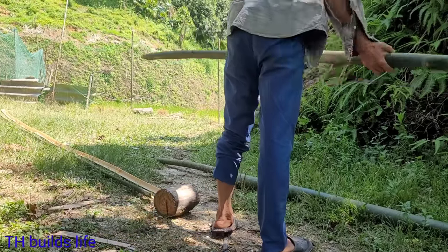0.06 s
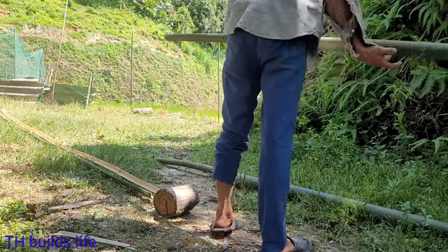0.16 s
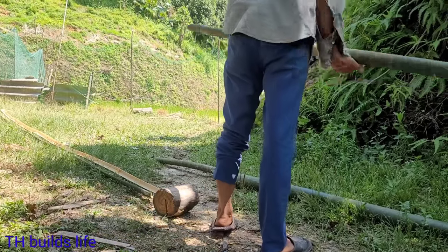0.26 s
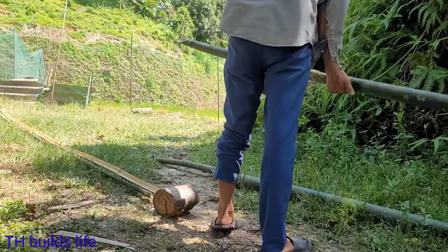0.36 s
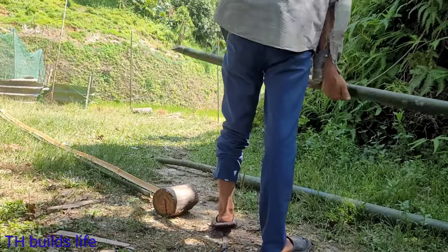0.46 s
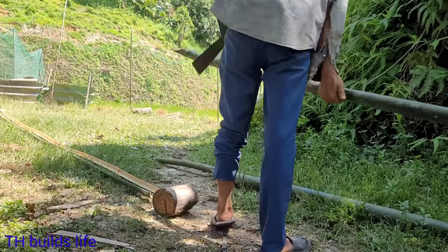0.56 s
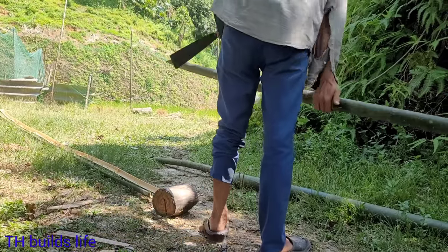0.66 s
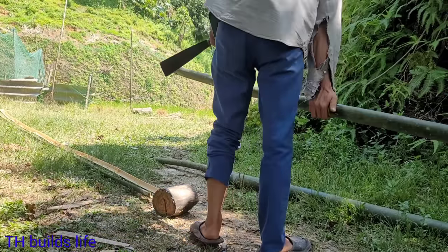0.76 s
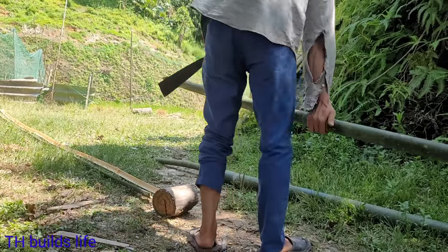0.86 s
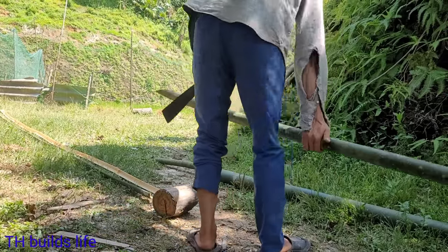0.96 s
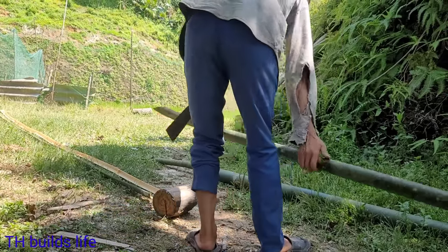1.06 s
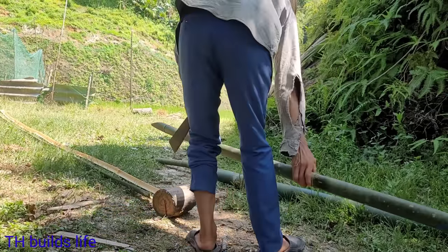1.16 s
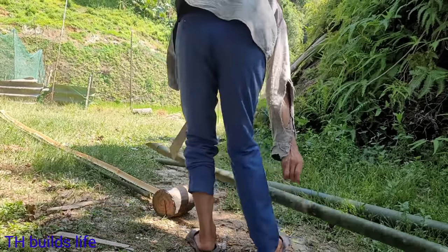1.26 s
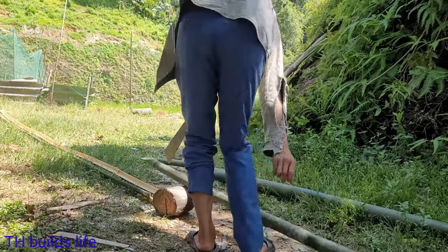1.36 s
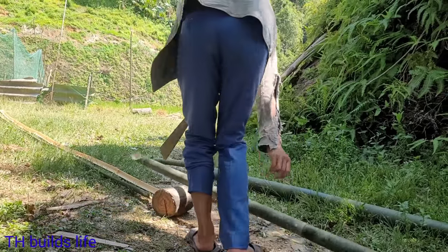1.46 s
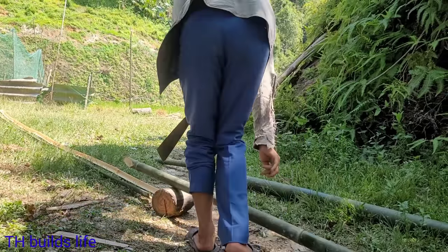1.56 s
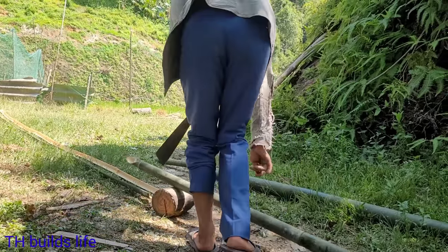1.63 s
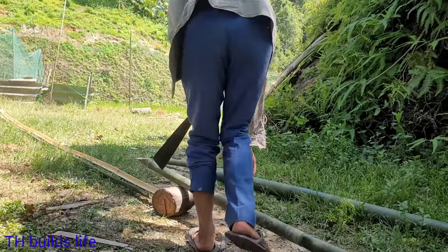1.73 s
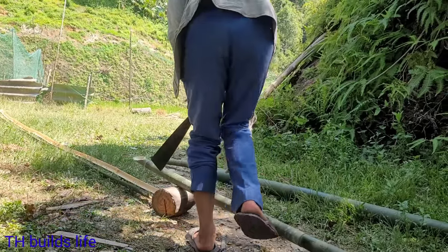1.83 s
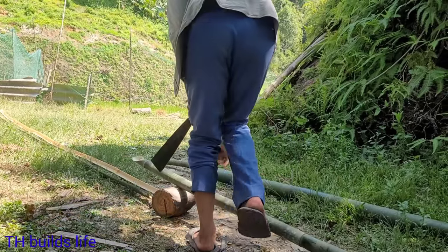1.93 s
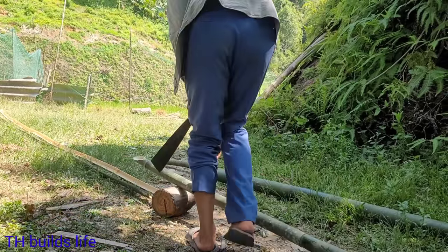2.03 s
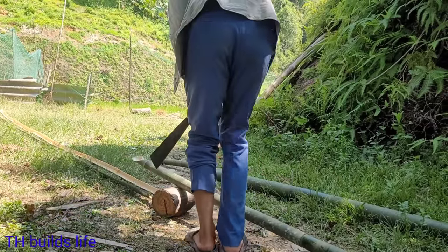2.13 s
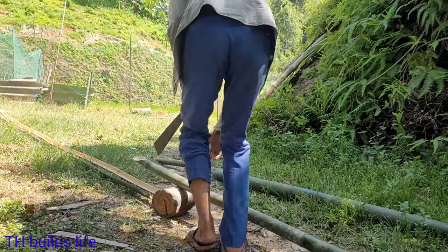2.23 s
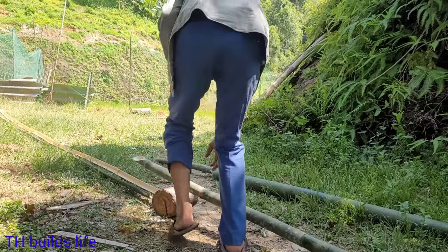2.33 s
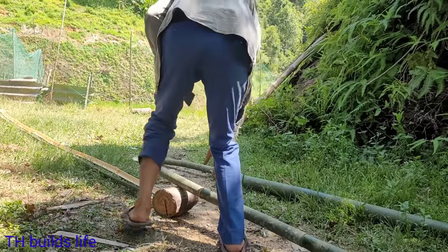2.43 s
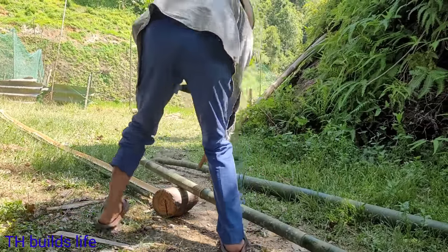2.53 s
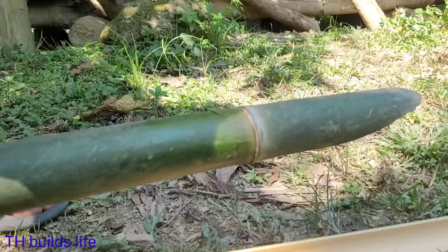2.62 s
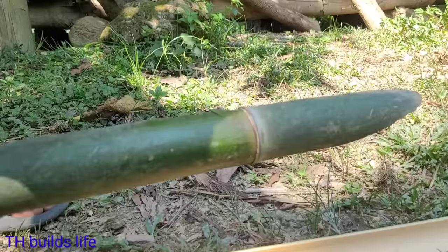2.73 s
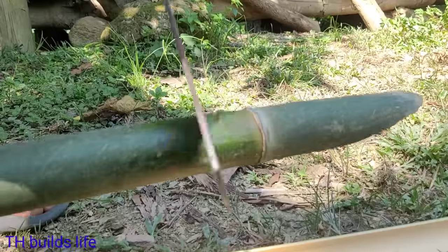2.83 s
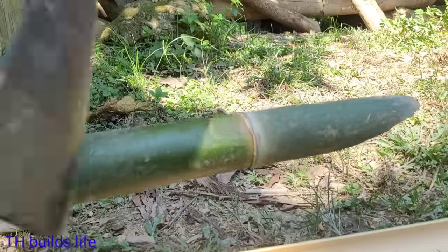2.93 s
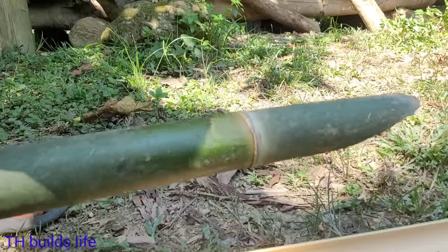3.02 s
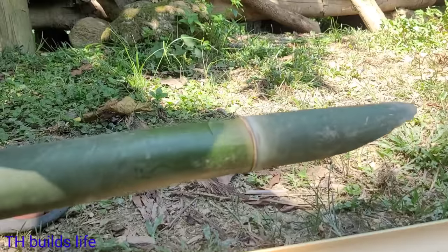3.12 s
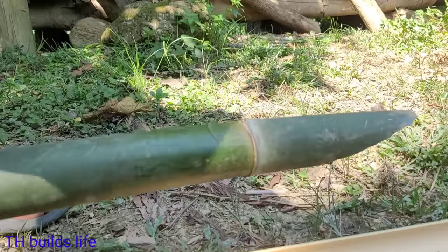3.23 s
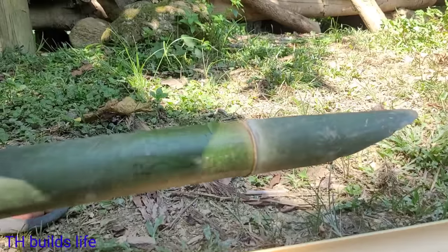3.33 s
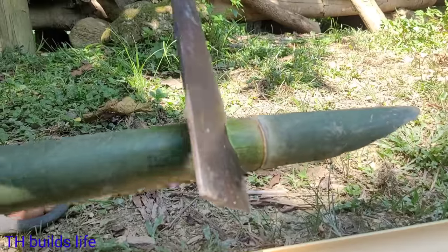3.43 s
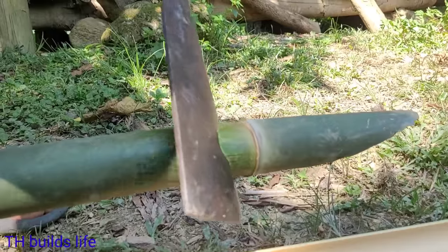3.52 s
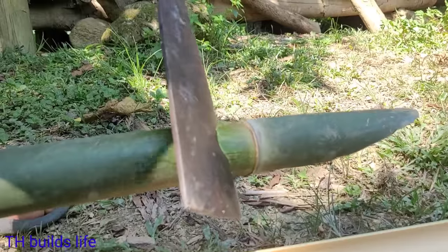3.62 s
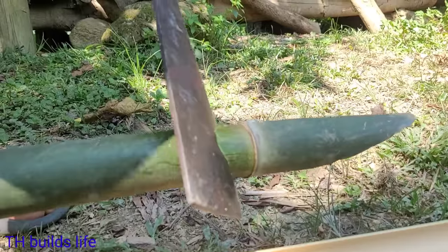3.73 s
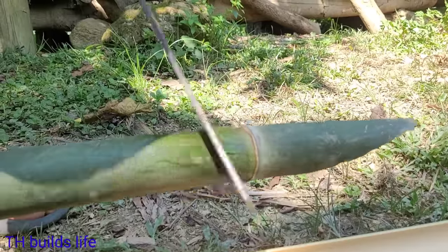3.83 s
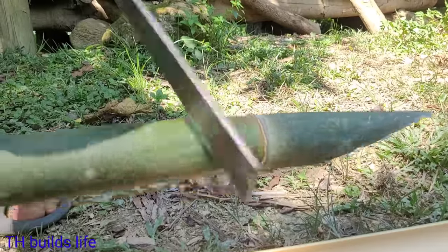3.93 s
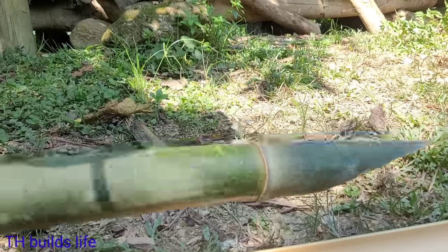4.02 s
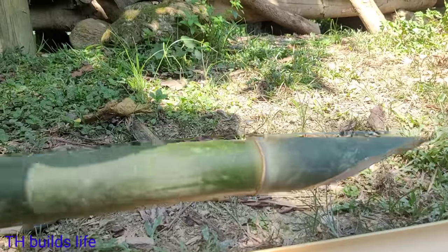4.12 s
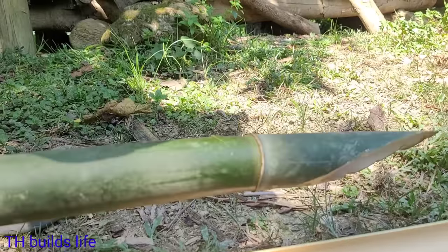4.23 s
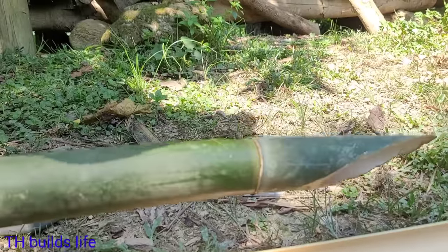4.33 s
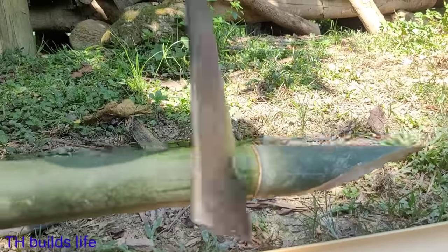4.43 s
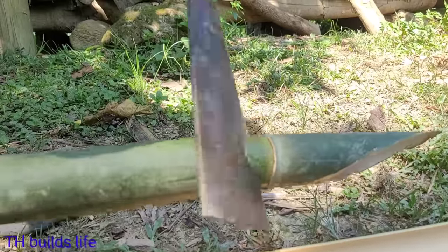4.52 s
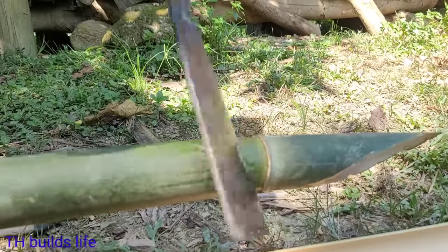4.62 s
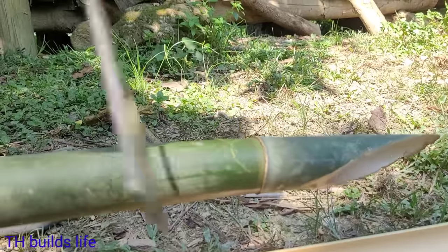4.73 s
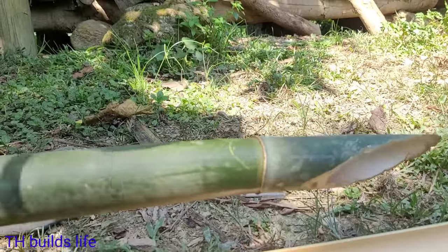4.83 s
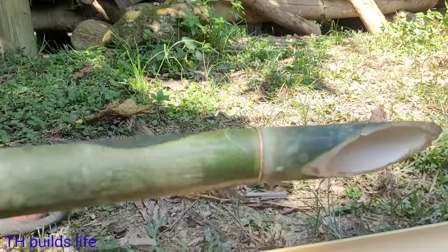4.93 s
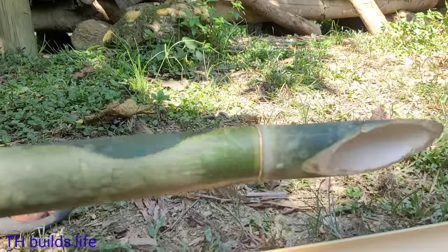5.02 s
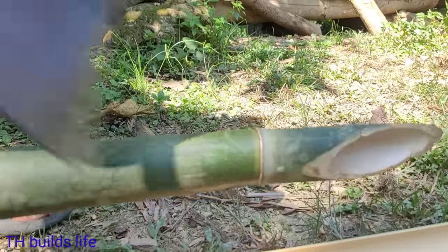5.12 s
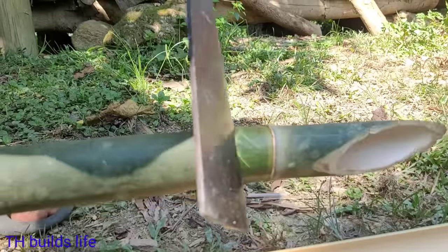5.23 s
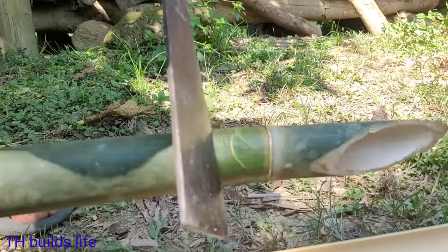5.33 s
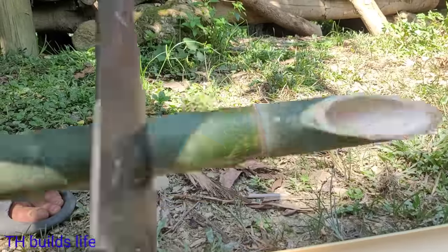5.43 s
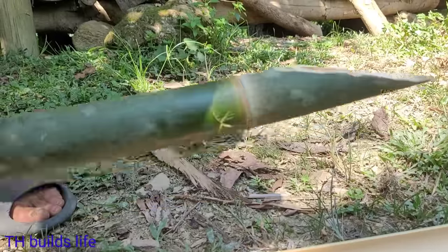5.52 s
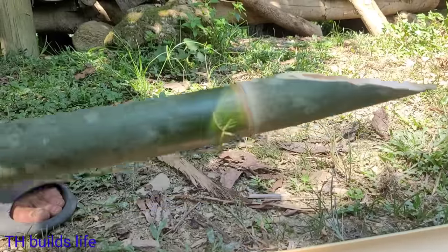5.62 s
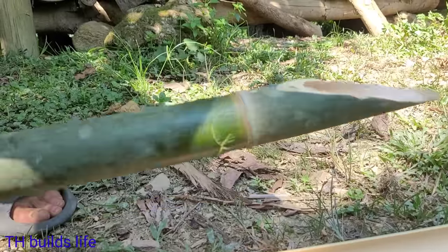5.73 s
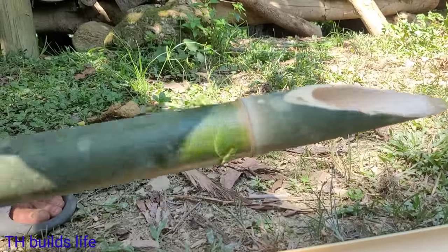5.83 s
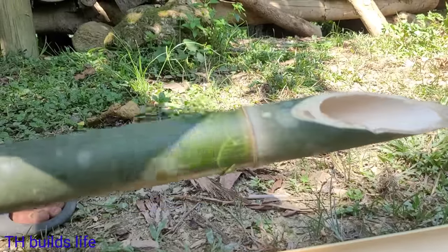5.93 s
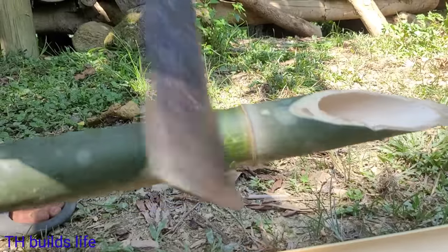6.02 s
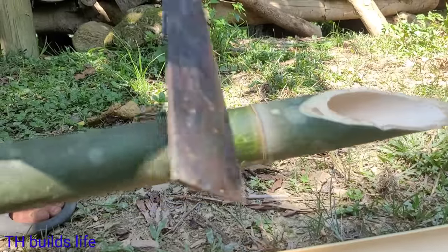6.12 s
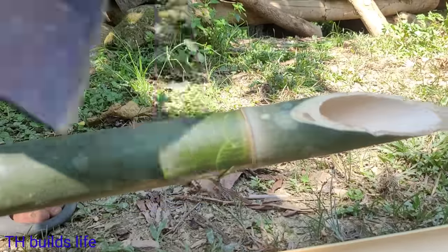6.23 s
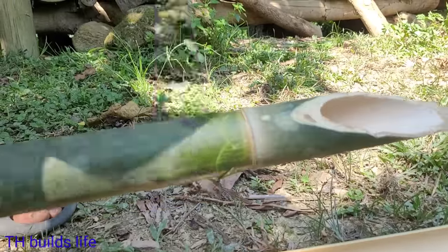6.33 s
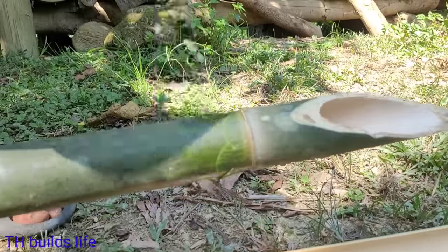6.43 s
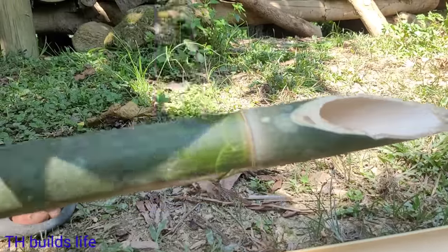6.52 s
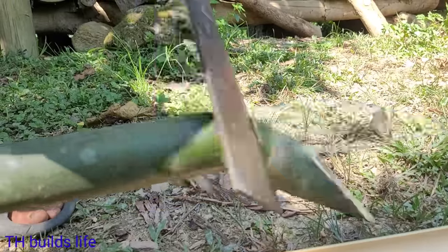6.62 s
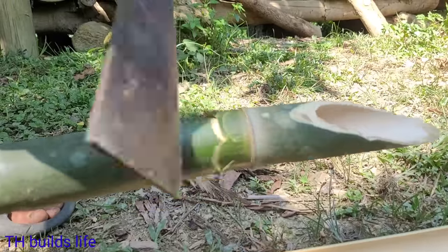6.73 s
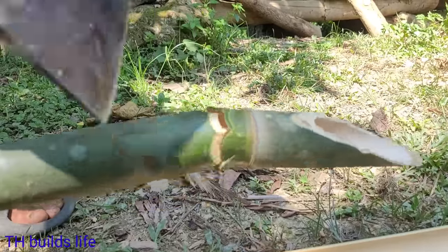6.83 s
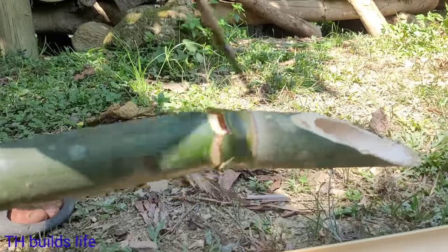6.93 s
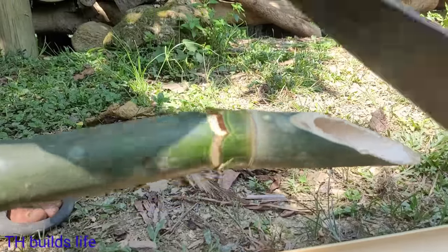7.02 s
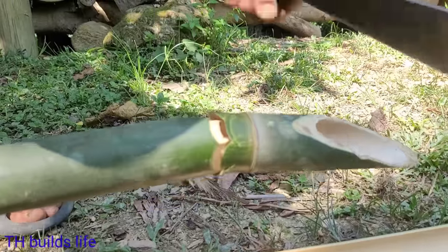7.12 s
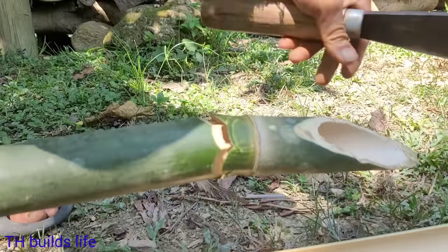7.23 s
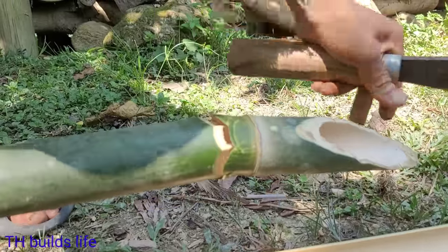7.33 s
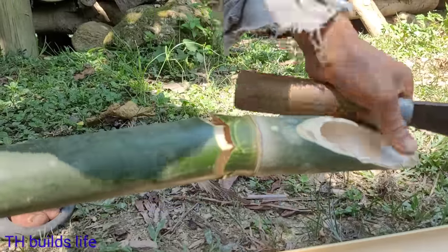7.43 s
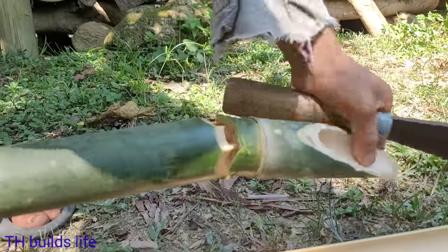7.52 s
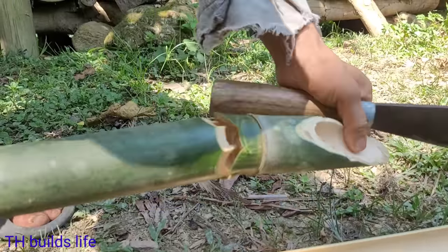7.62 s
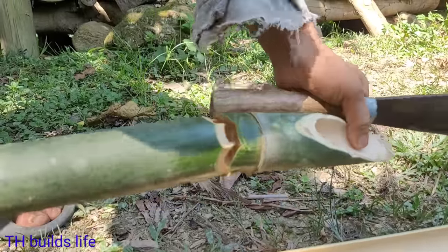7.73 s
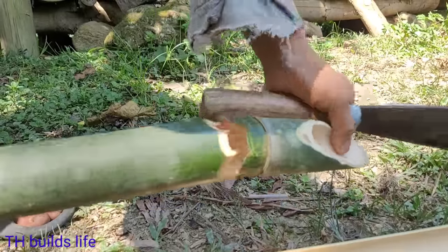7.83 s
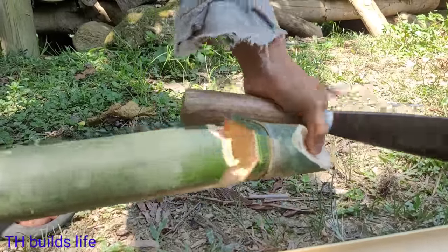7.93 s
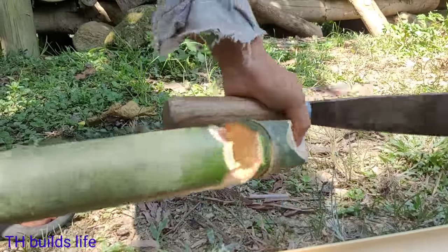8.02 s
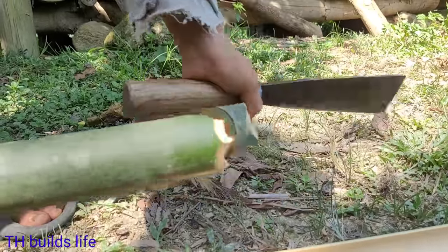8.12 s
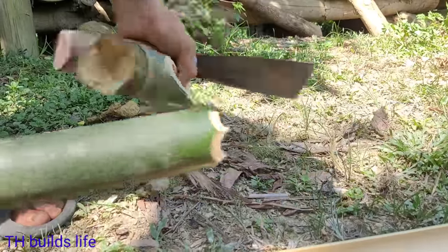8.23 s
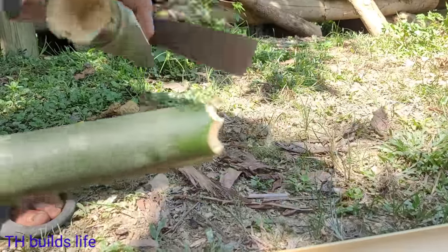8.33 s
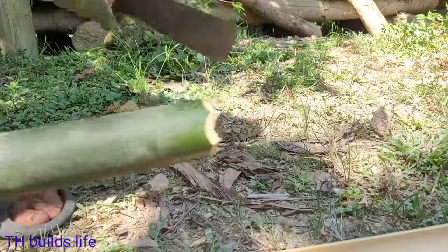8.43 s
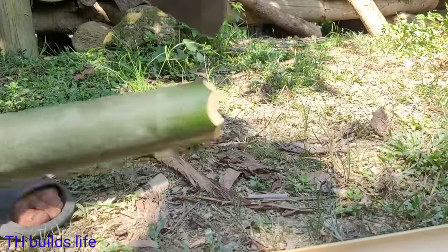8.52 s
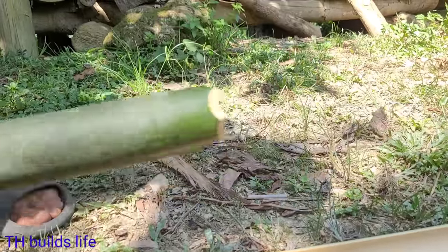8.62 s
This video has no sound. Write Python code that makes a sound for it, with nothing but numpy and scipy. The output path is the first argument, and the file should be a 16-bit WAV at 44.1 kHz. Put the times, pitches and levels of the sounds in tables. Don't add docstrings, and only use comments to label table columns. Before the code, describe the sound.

Outdoors with faint insects, bamboo drops with ringing hollow knocks, a blade chops it six times nearby, then fibres crack and rip apart.

```python
import sys
import numpy as np
from scipy import signal
from scipy.fft import rfft, irfft
from scipy.io import wavfile
from scipy.ndimage import uniform_filter1d

SR = 44100
rng = np.random.default_rng(int(sys.argv[2]) if len(sys.argv) > 2 else 0)


def wav_record(signal):
    frames = np.transpose(np.atleast_2d(signal))
    bounded = np.clip(frames, -1, 1)
    quanta = np.round(bounded * 32767).astype(np.int16)
    wavfile.write(sys.argv[1], SR, quanta)


def invert_db(x):
    u = np.asarray(x, float) / 20
    return 10 ** u


N = 381906
MOVE_S = 2.72


def ears(length, alike, lag):
    same, left, right = rng.standard_normal((3, length))
    alike = np.clip(alike, 0, 1)
    shared = np.array([same, np.roll(same, lag)])
    return np.sqrt(alike) * shared + np.sqrt(1 - alike) * np.array([left, right])


def grit(length, spread_db, size=40):
    grain_db = spread_db * np.minimum(rng.exponential(size=length // size + 1), 3)
    g = np.repeat(invert_db(grain_db), size)[:length]
    return g / np.sqrt(np.mean(g ** 2))


def fade(t, t60, rise):
    return (1 - np.exp(-t / rise)) * np.exp(-np.log(1000) * t / t60)


def swell(s, rise, fall, db, top=1.5):
    gain = np.zeros(N)
    first = max(int((s - 2 * rise) * SR), 0)
    last = min(int((s + 2 * fall) * SR), N)
    near = np.arange(first, last)
    t = near / SR - s
    gain[near] = invert_db(db - 24 * np.where(t < 0, -t / rise, t / fall) ** top)
    return gain


def pan(db):
    return invert_db([[db], [-db]])


def add(out, s, x):
    i = int(s * SR)
    out[:, i:i + x.shape[1]] += x[:, :N - i]


def through(x, h):
    return signal.oaconvolve(x, h[None], axes=1)[:, :x.shape[1]]


def causal(points):
    hz, db = np.transpose(points)
    log_hz = np.log(np.linspace(1, SR / 2, 1025))
    log_gain = np.interp(log_hz, np.log(hz), db, left=db[0] - 21.5) * np.log(10) / 20
    cep = irfft(log_gain)
    cep[1:1024] *= 2
    cep[1025:] = 0
    h = irfft(np.exp(rfft(cep)))
    return h / np.sqrt(np.sum(h ** 2))


def rings(modes, shift=1, count=2500):
    t = np.arange(count) / SR
    h = np.zeros(count)
    for k, (hz, db, t60) in enumerate(modes):
        h += (-1) ** k * invert_db(db) * np.sin(2 * np.pi * hz * shift * t) * fade(t, t60, 1e-5)
    return h / np.sqrt(np.sum(h ** 2))


# frequency in Hz, width in Hz, level in dB.
LOOSE_TUBE_MODES = [
    [(320, 170, -6), (393, 53, 7.5), (489, 15, 1), (605, 23, 3.5), (702, 60, -1)],
    [(797, 30, -1.5), (898, 91, -1), (1028, 27, -2), (1250, 43, -1)],
]
HELD_TUBE_MODES = [
    [(170, 100, -6.5), (280, 29, -7), (390, 74, -2.5), (489, 65, -2.5), (635, 70, -3), (740, 120, -1)],
    [(900, 71, -11.5), (1002, 110, -9.5), (1010, 63, 4.5), (1182, 30, -1.5)],
]
LOOSE_WALL_MODES = [(1340, 55, -6), (1681, 40, -5.5), (1820, 120, -10), (2010, 95, -4.5), (2510, 250, -9),
                    (3350, 770, -9), (3970, 730, -9.5), (4700, 430, -14.5)]
HELD_WALL_MODES = [(1370, 70, -1.5), (1567, 20, -2), (1790, 120, -2), (2070, 27, -4), (2340, 190, -5),
                   (2920, 170, -6), (3220, 140, -7.5), (4080, 290, -7.5), (4172, 590, -18),
                   (5260, 1100, -14.5)]


def tube(peaks, shift):
    spot_db = 1.6 * rng.standard_normal(len(peaks))
    modes = []
    for (hz, width_hz, db), d in zip(peaks, spot_db):
        width_hz = max(width_hz, hz / 20)
        modes.append((hz, db + d + 10 * np.log10(width_hz), 1.77 / width_hz))
    return rings(modes, shift)


def narrow(hz, width_hz, alike, size=8):
    low = signal.butter(2, width_hz / 2, fs=SR / size, output="sos")
    turn = 2 * np.pi * np.cumsum(hz * np.ones(N)) / SR

    def slow():
        x = signal.sosfilt(low, ears(N // size + 1, alike, 0))
        return uniform_filter1d(np.repeat(x, size, axis=1), size)[:, :N]

    band = slow() * np.cos(turn) + slow() * np.sin(turn)
    return band * np.sqrt(SR / size / 0.8 / width_hz)


def nearest(peak_s):
    peak_s = np.asarray(peak_s)
    return np.searchsorted((peak_s[1:] + peak_s[:-1]) / 2, np.arange(N) / SR)


# peak in seconds, level in dB.
BIRD_NOTES = [
    (4.27, -66),
    (4.97, -71.5),
    (6.39, -73.5),
]


def bird():
    peak_s = np.array(BIRD_NOTES)[:, 0]
    since_s = np.arange(N) / SR - peak_s[nearest(peak_s)]
    pitch_hz = 4900 - 7000 * np.clip(since_s, -.1, .3)
    gain = sum(swell(s, 0.066, .22, db) for s, db in BIRD_NOTES)
    return narrow(pitch_hz, 650.0, 0.25) * gain


# frequency in Hz, width in Hz, rms level in dB.
INSECT_BANDS = [(7860, 260, -82), (10400, 1000, -76.5), (11900, 450, -74)]
# frequency in Hz, level in dB per Hz.
AIR_COLOUR = [(30, -19), (131, -8.5), (1370, -28.5), (2600, -32), (4590, -21), (7180, -25), (11500, -9.5),
              (13200, -28)]


def bush():
    far_db, near_db = -62.5, -67
    shimmer = np.repeat(rng.standard_normal(N // 1500 + 1), 1500)[:N]
    shimmer = uniform_filter1d(shimmer, 1500)
    db = np.where(np.arange(N) < MOVE_S * SR, far_db - near_db, 0) + 0.86 * shimmer
    insects = sum(invert_db(level_db) * narrow(hz, width_hz, .1) for hz, width_hz, level_db in INSECT_BANDS)
    air = through(ears(N, 0.47, 0) * invert_db(near_db), causal(AIR_COLOUR))
    return (air + insects) * invert_db(db) + bird() * grit(N, 1.0, size=300)


# peak, rise and fall in seconds, level in dB.
RUMBLE_SWELLS = [(2.22, .05, 0.11, -50.5), (3.52, .04, .12, -37.5), (4.12, 0.022, .05, -39),
                 (4.25, 0.013, 0.066, -52), (4.56, .04, 0.1, -32), (5.12, .05, 0.085, -58),
                 (5.66, .05, 0.18, -47.5), (3.05, .1, .12, -54), (5.815, .01, .12, -38),
                 (6.9, .1, .07, -58), (8.26, .015, 0.052, -35), (8.4, .1, .12, -54.5),
                 (8.58, 0.055, .12, -59.5)]
# frequency in Hz, level in dB per Hz.
SOIL_COLOUR = [(50, -20), (110, -3), (200, -0.5), (330, -4), (600, -14), (1200, -35)]


def rumble():
    gain = sum(swell(*row) for row in RUMBLE_SWELLS)
    pushes = ears(N, 0.92, 8) * grit(N, 3.0, size=400)
    return through(pushes * gain, causal(SOIL_COLOUR))


# peak, rise and fall in
# seconds, wall level in dB, hiss level in dB.
RUB_SWELLS = [(.03, .02, 0.11, -59.5, -76), (.15, .12, 0.11, -67, -64), (.21, .1, 0.038, -74, -46.5),
              (.304, 0.0064, .2, -35.5, -38), (.41, 0.116, .12, -38.5, -42), (.5, 0.031, .06, -46, -55.5),
              (.63, .08, .08, -55, -53), (.7, 0.085, .1, -55, -62), (.885, 0.014, 0.081, -45.5, -43),
              (1.262, .06, .05, -39.5, -45.5), (1.36, .1, .1, -48, -45), (1.47, .06, .12, -40, -36),
              (1.5, .09, .42, -35, -50), (1.62, .04, .08, -42, -54), (1.72, .1, .12, -40.5, -60),
              (2.203, 0.033, 0.03, -37.5, -35), (2.24, .03, 0.065, -47.5, -50), (2.312, .02, .02, -63, -52.5),
              (2.38, .015, .07, -50.5, -51), (2.688, .03, .04, -40, -46.5),
              (2.79, 0.033, 0.043, -49, -52), (3.315, .04, .05, -68.5, -80), (3.716, .15, 0.041, -63.5, -54),
             (3.864, .03, 0.11, -55.5, -49.5), (4.022, .012, 0.027, -45.5, -75),
             (4.068, 0.0098, 0.033, -38, -70), (4.245, .015, .055, -45.5, -70),
             (5.0, 0.089, .05, -64.5, -66), (5.35, .06, 0.083, -48, -43), (5.413, .007, 0.23, -44, -42.5),
             (5.7, 0.054, 0.17, -57.5, -72), (7.6, .08, .08, -66, -67), (8.165, .012, 0.11, -40, -38),
             (8.3, .1, .1, -55, -60), (8.42, .12, 0.064, -50.5, -58.5), (8.53, .08, .1, -69.5, -67.5),
             (8.66, 0.043, .1, -60, -60)]
# frequency in Hz, level in dB per Hz.
RUB_WALL_COLOUR = [(120, -48.5), (200, -18), (311, -8.5), (384, -4.5), (717, -8), (895, -2), (2300, -7.5),
                   (6500, -30)]
RUB_HISS_COLOUR = [(1650, -30.5), (3000, -1.5), (7130, -5.5), (11800, -5.5), (15000, -9.5), (16200, -16)]


def rubs():
    rows = RUB_SWELLS
    wall_gain = sum(swell(s, rise, fall, db) for s, rise, fall, db, _ in rows)
    hiss_gain = sum(swell(s, rise, fall, db) for s, rise, fall, _, db in rows)
    slips = ears(N, 0.14, -19)
    ringing = tube(HELD_TUBE_MODES[1] + HELD_WALL_MODES[:5], 1.02)[:1500]
    body = causal(RUB_WALL_COLOUR)[:1500] + 0.31 * ringing
    coarse = slips * grit(N, 3.6, size=100) * grit(N, 1.8, size=500) * wall_gain
    fine = slips * grit(N, 1.5) * hiss_gain
    return through(coarse, body) + through(fine, causal(RUB_HISS_COLOUR))


# peak in seconds, frequency in Hz, level in dB.
PALM_HUMS = [
    (7.15, 520, -75),
    (7.32, 712, -65.5),
    (7.82, 694, -65.5),
]


def palm():
    s, hz, _ = np.transpose(PALM_HUMS)
    gain = sum(swell(at, .09, .13, db) for at, _, db in PALM_HUMS)
    return narrow(hz[nearest(s)], 120., 0.54) * gain


# start in seconds, peak in dB,
# frequency in Hz, t60 in seconds.
SINGLE_SLIPS = [(.303, -27, 1730, .03), (.385, -29, 1300, .03), (.418, -30, 1600, .03), (.432, -30, 1900, .02),
                (.512, -30.5, 1430, .03), (.606, -36.5, 1600, 0.028), (.655, -39, 1060, 0.045),
                (.657, -46, 1800, .02), (.699, -42, 2010, .02), (.712, -48, 950, .03), (.877, -38, 1520, .02),
                (.888, -34, 2140, .03), (.94, -44, 4500, .01), (1.243, -35, 1010, .04),
                (1.255, -29, 1300, .03), (1.536, -21, 670, 0.047), (1.587, -10, 1520, .012),
                (1.663, -15, 3800, 0.011), (1.757, -29, 1900, .02), (1.815, -15.5, 1860, .03),
                (1.961, -21, 1300, .008), (1.968, -17.5, 805, .02), (2.176, -28, 1300, 0.018),
                (2.201, -22, 1530, 0.022), (2.246, -38, 1800, 0.018), (2.275, -42, 2670, .02),
                (2.309, -41.5, 2890, .02), (2.372, -37.5, 1950, 0.019), (2.398, -34, 821, 0.026),
                (2.682, -32, 2000, .02), (1.411, -7, 4020, 0.013), (1.815, -16, 2560, 0.032),
                (1.815, -18, 5500, 0.01), (1.589, -16.5, 4000, 0.01), (1.452, -9, 1460, .03),
                (2.11, -38, 422, 0.13),
                (2.779, -38, 1140, .02), (2.792, -39, 1190, .02), (3.855, -42, 4800, .01),
              (3.952, -38, 600, .04), (3.96, -42, 2260, 0.044), (4.021, -37, 1500, 0.022),
              (4.095, -30, 3190, .012), (4.096, -17, 516, 0.023), (4.066, -28, 1250, .025),
              (4.118, -23.5, 280, .04), (4.237, -35.5, 1200, .02), (4.24, -36, 260, .08),
              (5.415, -29, 520, 0.083), (5.506, -34, 902, .04), (5.543, -42, 945, .04),
              (5.575, -33.5, 1010, .05), (5.649, -35, 996, .04), (5.7, -45, 2050, 0.037),
              (5.745, -48, 525, .04), (5.766, -40, 501, 0.056), (5.896, -48.5, 1900, .02),
              (8.21, -21.5, 1990, 0.022), (8.249, -32, 2400, .015), (8.258, -33, 1790, .025),
              (8.268, -32, 1850, .02), (8.297, -33, 1800, .015), (8.31, -38, 740, .12),
              (8.336, -36.5, 1800, .025), (8.369, -41, 1950, .03), (8.39, -43, 2100, .02),
              (8.407, -27.5, 2120, .02), (8.418, -28, 1600, .02), (8.442, -40, 2500, .015),
              (8.455, -44, 2200, .02), (8.515, -59, 1100, .1), (8.547, -53, 1150, .12),
              (8.575, -56, 1100, .08), (6.642, -7.5, 7960, .025), (5.81, -38, 2670, .03),
              (5.602, -23, 308, 0.035), (4.54, -12.5, 400, 0.13), (4.733, -33.5, 600, .04),
              (4.74, -40.5, 1017, 0.087), (4.945, -45.5, 2000, .03), (7.507, -53, 3150, 0.063),
              (7.6, -52, 1000, .06), (7.59, -63, 3200, .1), (3.01, -41.5, 2140, .06),
              (2.965, -37, 1700, .06), (2.876, -4, 500, .02), (7.955, -23.5, 2310, 0.038)]


def ticks(count=4000):
    out, t = np.zeros((2, N)), np.arange(count) / SR
    for s, db, hz, t60 in SINGLE_SLIPS:
        lag, pan_db = (18, 1.2) if s > MOVE_S else (-22, -1.5)
        modes = [(hz, 0, t60), (1.23 * hz, -7, .6 * t60), (.78 * hz, -8, .6 * t60)]
        contact = ears(count, .8, lag) * fade(t, 0.0055, .0002)
        x = through(contact, rings(modes, count=count))
        add(out, s, invert_db(db) * x / np.abs(x).max() * pan(pan_db))
    return out


# start in seconds, peak in dB.
BLADE_TAPS = [
    (3.9549, -36.5),
    (5.3537, -36),
    (5.3694, -37),
    (5.3794, -35.5),
    (5.4126, -27),
    (5.4311, -25.5),
]
# frequency in Hz, level in dB, t60 in seconds.
BLADE_MODES = [(4753, -10, 0.083), (6174, -2, 0.12), (7840, -0.5, 0.11), (11060, -5, 0.14),
               (13770, -15, 0.056)]
# frequency in Hz, level in dB per Hz.
EDGE_COLOUR = [(1760, -37.5), (3000, -9), (4960, -4.5), (7960, -4), (9560, -4), (11900, -2.5), (15400, -12),
               (16200, -24.5)]


def clinks(count=6000):
    out, t = np.zeros((2, N)), np.arange(count) / SR
    ring = rings([(hz, db, min(t60, .045)) for hz, db, t60 in BLADE_MODES])[:2000]
    steel = ring + 0.52 * causal(EDGE_COLOUR)[:2000]
    for s, db in BLADE_TAPS:
        tap = ears(count, 0.39, 20) * fade(t, 0.0041, .0002)
        add(out, s, invert_db(db + 9.5) * through(tap, steel))
    return out


# start in seconds, peak in dB, frequency in Hz, t60 in seconds.
CLEAR_NOTES = [(1.431, -4.5, 390, 0.23), (1.589, -15, 393, 0.13), (1.679, -16, 607, 0.25),
               (1.975, -27.5, 420, 0.32), (2.077, -34, 452, 0.25), (2.89, -16, 462.6, 0.24),
               (5.132, -50, 482, 0.06), (6.665, -12.5, 885, 0.22), (8.261, -29, 344, 0.11)]
# start in seconds, peak in dB, frequency in Hz.
LOW_TUBE_NOTES = [(6.67, -11.5, 170), (7.52, -48, 167), (8.317, -38, 156), (8.399, -42.5, 128),
                  (8.45, -47, 130)]
HIGH_TUBE_NOTES = [(1.411, 6, 1370), (1.776, -22, 1370), (2.832, 1, 1030), (3.437, 3, 1035),
                   (5.214, -2, 1040), (5.2973, -19, 1010), (5.6029, -10, 1057), (5.695, -25.5, 1000),
                   (6.102, 7, 1070), (6.2814, -36, 1002), (6.6536, 3, 1560), (7.508, -31, 970),
                   (7.509, -42, 1500)]
REST_KNOCK_NOTES = [(1.434, 6, 880), (1.454, 7, 440), (1.444, 5, 800), (2.853, 8, 490), (3.433, 9, 474),
                    (4.506, 8, 690), (5.229, 6, 368), (5.233, 2, 720), (5.25, 0, 290), (6.104, 8, 503),
                    (6.659, 5, 430), (6.658, 3, 680), (6.66, 1, 1100), (1.433, 6, 530), (4.51, 5, 480),
                    (2.828, 3, 620)]


def notes(count=9000):
    out, t = np.zeros((2, N)), np.arange(count) / SR
    rows = list(CLEAR_NOTES)
    for table, t60_s in ((LOW_TUBE_NOTES, .27), (HIGH_TUBE_NOTES, 0.092), (REST_KNOCK_NOTES, .055)):
        rows += [(*row, t60_s) for row in table]
    for s, db, hz, t60 in rows:
        lag = [[0], [12]] if s > MOVE_S else [[14], [0]]
        late = t - np.array(lag) / SR
        neighbour = np.sin(2 * np.pi * (1.06 * hz * late + rng.random((2, 1))))
        tone = np.sin(2 * np.pi * hz * late) + 0.27 * neighbour
        add(out, s, invert_db(db - 6) * tone * fade(t, t60, 0.0047) * pan(.8))
    return out


# start in seconds, peak in dB, wall knock in dB relative, tail t60 in seconds.
FIBRE_SNAPS = [(0.4733, -22, 8, 0.03), (0.6285, -34.5, -0.5, 0.12), (0.9187, -38, 7.5, 0.063),
               (1.2233, -33, -0.5, 0.06), (1.2725, -15, -3, 0.04), (1.2956, -16.5, -6.5, 0.05),
               (1.3256, -25.5, -9, 0.03), (1.429, -12, -3, .05), (1.6621, -21.5, 1, 0.06),
               (2.374, -41, -4, 0.06), (2.3975, -39, -3.5, 0.06), (2.776, -43.5, 0.5, 0.06),
               (2.8644, -11, -3.5, 0.095), (2.9039, -10, -10.5, 0.052), (2.9177, -9.5, -19, 0.074),
               (3.8646, -27.5, -20, 0.047), (3.8896, -38.5, -28.5, 0.038), (7.865, -8, -7.5, 0.16),
               (7.9529, -11, -15, 0.12), (7.9566, -9.5, -19, 0.053), (8.014, -14, -17, 0.14),
               (8.0606, -13.5, -15.5, 0.14), (8.1626, -24.5, -15.5, 0.037), (8.2059, -24.5, 4.5, 0.12),
               (8.315, -26.5, 3, 0.036), (8.4091, -39, 6, 0.092), (8.4412, -44, 2, 0.052)]
# frequency in Hz, level in dB per Hz.
SLAP_COLOUR = [(120, -19.5), (300, -4), (700, 1), (2000, -3), (5000, -19)]


def snaps(count=7000):
    crack, knock, t = np.zeros((2, N)), np.zeros((2, N)), np.arange(count) / SR
    click = fade(t, .005, .0001)
    for s, db, knock_db, t60 in FIBRE_SNAPS:
        lag, left_minus_right_db = (18, 4) if s > MOVE_S else (-22, -5.5)
        tail = invert_db(-8.5) * fade(t, 0.27 * t60, 0.00027) + invert_db(-16.5) * fade(t, t60, .001)
        burst = ears(count, 0.38, lag) * (1.3 * click + grit(count, 3.5) * tail)
        burst *= invert_db(db - 6) * pan(left_minus_right_db / 2)
        add(crack, s, burst)
        add(knock, s, invert_db(knock_db) * burst)
    wall = tube(HELD_WALL_MODES, 0.95)[:2000] + .5 * causal(SLAP_COLOUR)[:2000]
    return through(crack, causal(EDGE_COLOUR)) + through(knock, wall)


# peak, rise and fall in seconds, level in dB.
TEAR_SWELL = (8.131, .026, 0.0412, -11.5)
# frequency in Hz, level in dB per Hz.
SPLIT_COLOUR = [(290, -46.5), (500, -19), (1350, -5.5), (2380, -6), (3130, -6.5), (10000, -7),
                (14900, -10.5), (16200, -26)]


def tear():
    fibres = ears(N, 0.51, 18) * grit(N, 2.4, size=60) * swell(*TEAR_SWELL, top=9.)
    body = causal(SPLIT_COLOUR) + 0.28 * tube(HELD_WALL_MODES, 1)[:2048]
    return through(fibres, body) * pan(1.5)


def blows(table, peaks, wall, lag, pan_db, t60, thump_hz, thump_t60, count):
    out, t = np.zeros((2, N)), np.arange(count) / SR
    edge, slap = causal(EDGE_COLOUR)[:500], causal(SLAP_COLOUR)[:900]
    tick = fade(t, 0.016, 0.00052)
    for s, ring_db, thump_db, upper_db, knock_db, crack_db in table:
        chatter = ears(count, 0.89, 2 * lag // 3) * grit(count, 4.1)
        spray = ears(count, 0.36, lag) * grit(count, 1.3)
        last = t60 * invert_db(0.024 * (ring_db + 8))
        ring = 1.3 * tick + fade(t, last, 0.0014) + invert_db(-18.0) * fade(t, .35, 0.0073)
        upper = 1.6 * tick + fade(t, 0.81 * last, 0.00041) + invert_db(-20.5) * fade(t, .33, 0.0045)
        knock = 1.1 * tick + fade(t, 0.054, 0.00022) + invert_db(-7.5) * fade(t, 1.4 * last, .001)
        knock += invert_db(-27) * fade(t, 0.42, 0.0062)
        crack = fade(t, .018, 0.00021) + invert_db(-16.5) * fade(t, 1.24 * last, 0.0018)
        crack += invert_db(-34.5) * fade(t, 0.25, .02)
        push = fade(t, 0.0028, .0001)

        shift = 1 + 0.027 * rng.standard_normal()
        turn = 2 * np.pi * thump_hz * t + np.array([[0], [.8]])
        boom = np.sin(turn * shift) + 0.47 * np.sin(1.45 * turn / shift)
        boom += 0.12 * np.sin(.62 * turn) + 0.23 * np.sin(2.1 * turn * shift)
        boom *= fade(t, thump_t60, 0.005) * np.sqrt(1 - t / t[-1])

        x = invert_db(-7.5) * through(chatter * ring, tube(peaks[0], shift))
        x += invert_db(upper_db - 5) * through(chatter * upper, tube(peaks[1], shift))
        x += invert_db(knock_db - 2) * through(spray * knock, tube(wall, shift))
        x += invert_db(0.8 * knock_db - 6) * through(chatter * push, slap)
        x += invert_db(crack_db + 1) * through(spray * crack, edge)
        ground = invert_db(thump_db - 2.5) * boom * invert_db([[3.0], [-4.5]])
        add(out, s, invert_db(ring_db) * (x * pan(pan_db) - ground))
    return out


LANDINGS = [(0.472, -32.5, -43, -2), (1.409, -6, -21, -9.5), (1.432, -6, -30, -11),
            (1.587, -13, -30, -15.5), (1.665, -13, -8, -22.5), (1.777, -26, -21, -21),
            (1.815, -21, -20, -9), (1.841, -27, -23, -12), (1.965, -19.5, -45, -32),
            (2.077, -30.5, -44, -37), (2.197, -36, -15.5, 0.5)]


def dropped():
    table = [(s, db, thump, -1.5, 0.5 + .5 * crack, crack) for s, db, thump, crack in LANDINGS]
    return blows(table, LOOSE_TUBE_MODES, LOOSE_WALL_MODES, lag=-24, pan_db=-1.67, t60=0.2,
                 thump_hz=60, thump_t60=0.068, count=11000)


HELD_KNOCKS = [(2.876, -11.5, -3, -4.5, -10), (3.474, -16.5, -14, -16.5, -20), (3.864, -45.5, -11, -9, 8),
               (3.953, -42, -35, -13, 4.5), (4.096, -28.5, -2.5, -5.5, -28), (4.728, -38, -25, -9.5, 6),
               (4.9, -39, -18, -1, -28), (4.944, -50.5, -9, -2, -12), (5.297, -18.5, -23, -8.5, -13.5),
               (5.352, -24.5, -19, -9, -24.5), (5.601, -19, -29, -3, -35.5), (5.81, -28, -8, -5, -36.5),
               (5.826, -30, -15, -9, -34), (6.145, -15, -11.5, -18, -28), (6.218, -34.5, 1.5, -0.5, -24),
               (6.849, -41, -4, -22, -28), (7.507, -44, -22, 0, -22), (7.864, -32.5, -25.5, 4.5, 12.5),
               (8.1, -21, -15, -2, 10), (8.252, -28, -5.5, -15, -30)]


def nudged():
    table = [(s, db, thump, upper, -2.5 + 0.51 * upper + .2 * crack, crack)
             for s, db, thump, upper, crack in HELD_KNOCKS]
    return blows(table, HELD_TUBE_MODES, HELD_WALL_MODES, lag=18, pan_db=0.9, t60=0.16,
                 thump_hz=58.7, thump_t60=0.4, count=13000)


# start in seconds, tube ring peak in dB, ground thump in dB,
# jolt delay in seconds, jolt ring in dB.
MACHETE_CHOPS = [
    (2.828, -7.5, -9, .019, -9),
    (3.427, -5, -11.5, .021, -9.5),
    (4.49, -5, -9.5, .019, -10),
    (5.21, -9, -11, .02, -10.5),
    (6.097, -3.5, -13.5, .017, -9),
    (6.641, -12.5, -11, .02, -10),
]
JOLT_LEVELS_DB = (-23, -15, -16.5, -29)


def chopped():
    upper_db, knock_db, crack_db = -5, -12.5, -7
    bites = [(s, db, thump - db, upper_db - db, knock_db - db, crack_db - db)
             for s, db, thump, _, _ in MACHETE_CHOPS]
    jolts = [(s + late, db, *JOLT_LEVELS_DB) for s, _, _, late, db in MACHETE_CHOPS]
    return blows(bites + jolts, HELD_TUBE_MODES, HELD_WALL_MODES, lag=18, pan_db=0.7, t60=0.16,
                 thump_hz=54.9, thump_t60=0.4, count=15000)


def scene():
    background = bush() + rumble() + rubs() + palm()
    details = ticks() + clinks() + notes()
    breaking = snaps() + tear()
    return background + details + breaking + dropped() + nudged() + chopped()


def top_cut(x):
    return signal.sosfilt(signal.butter(12, 16400, fs=SR, output="sos"), x)


def record(dry):
    top_hz = 16150
    dull = signal.sosfilt(signal.cheby2(8, 30, top_hz, fs=SR, output="sos"), dry)
    mix = np.clip(1.293 * np.tanh(dull / 1.174), -1, 1)
    return top_cut(mix)


dry = scene()
out = record(dry)
wav_record(out)
```